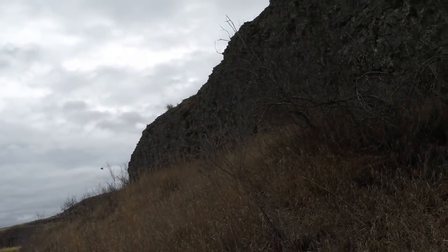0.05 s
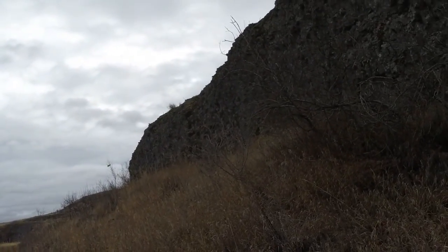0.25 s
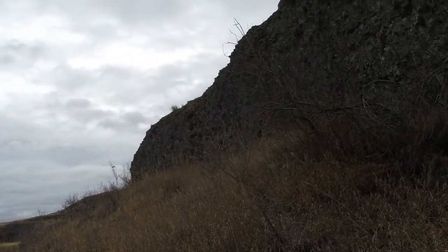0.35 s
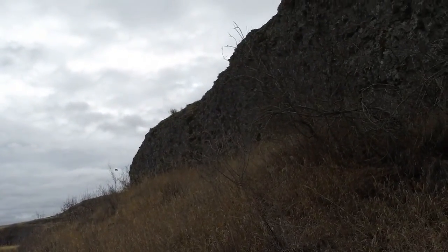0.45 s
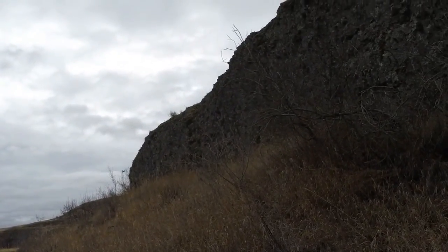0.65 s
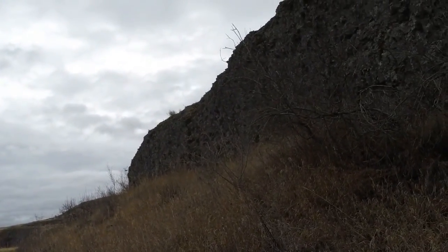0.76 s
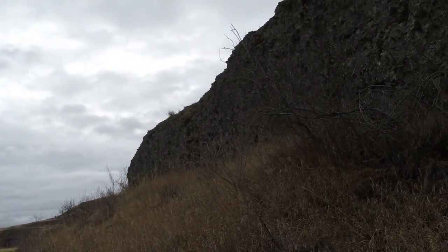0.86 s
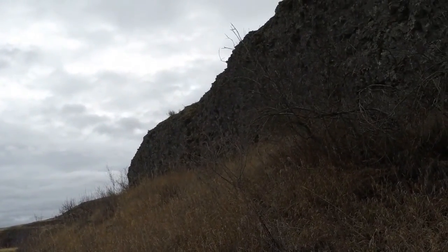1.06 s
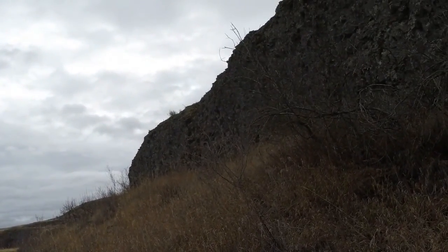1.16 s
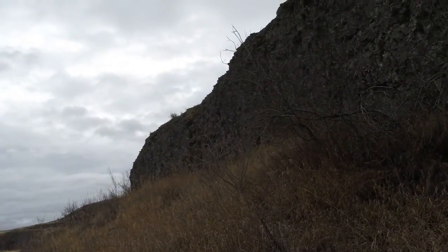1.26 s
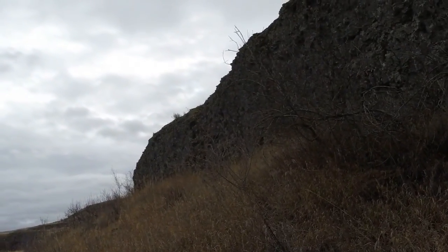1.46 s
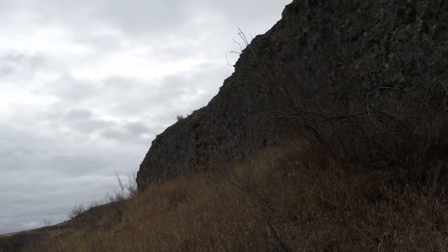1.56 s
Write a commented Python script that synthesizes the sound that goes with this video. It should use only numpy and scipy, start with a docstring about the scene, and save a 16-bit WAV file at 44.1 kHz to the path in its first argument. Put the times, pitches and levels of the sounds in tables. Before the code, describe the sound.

Two loud shotgun blasts echo off a rock cliff and open hills in light wind.

```python
"""Two shotgun blasts below a rock cliff in open hills, close enough to overload the microphone.
Each follows a thin pellet crack, arrives with its ground bounce, slaps back once from near rock,
then scatters off the rough cliff. The hills roll the sound back, ever duller, and a far face
returns a small clap. Light wind buffets the microphone; a faint hiss sinks after the first blast."""
import sys
import numpy as np
from scipy import signal
from scipy.fft import rfft, irfft, next_fast_len
from scipy.io import wavfile
from scipy.ndimage import uniform_filter1d

SR = 44100
rng = np.random.default_rng(int(sys.argv[2]) if len(sys.argv) > 2 else 0)


def store_pcm(level_fs):
    """Save levels as 16-bit WAV."""
    pcm = np.round(np.clip(level_fs, -1, 1) * 32767).astype(np.int16)
    wavfile.write(sys.argv[1], SR, np.atleast_2d(pcm).T)


N = 70560
N_FFT = next_fast_len(N + 8192)
TIME_S = np.arange(N) / SR
FREQ_HZ = np.fft.rfftfreq(N_FFT, 1 / SR)

# muzzle blasts: t/s, level/dB, overpressure/ms, ground bounce delay/ms, cut-off/Hz, relative grit/dB
SHOTS = [(.2194, 14, .43, 1.26, 14000, -18), (.9823, 11, .45, 1.17, 8500, -11.5)]
# spectrum of front roughness and pellet cracks: f/Hz, level/dB
GRIT_SPECTRUM = [(100, -26.5), (700, -14.5), (1200, -7.5), (1650, 9.5), (2500, -1.5), (4600, 5),
                 (6500, -7.5), (15000, -12.5)]


def amp(db):
    """Decibels to gain."""
    return 10 ** (np.asarray(db) / 20)


def unit_rms(x):
    """Scale to rms 1."""
    return x / np.sqrt(np.mean(x ** 2) + 1e-20)


def log_interp(points, hz=FREQ_HZ):
    """Interpolate (f/Hz, value) points on a log frequency axis."""
    point_hz, values = np.transpose(points)
    return np.interp(np.log(hz + 1), np.log(point_hz + 1), values)


def gain_curve(points):
    """Gain per sample from (t/s, level/dB) points."""
    return amp(np.interp(TIME_S, *np.transpose(points)))


def lowpass(cut_hz):
    """First-order treble loss, as gain per frequency."""
    return 1 / np.hypot(1, FREQ_HZ / cut_hz)


def causal_filter(x, gain):
    """Minimum-phase filter with the given gain per frequency."""
    cepstrum = irfft(np.log(np.maximum(gain, 1e-6)), N_FFT)
    cepstrum[1:N_FFT // 2] *= 2
    cepstrum[N_FFT // 2 + 1:] = 0
    return irfft(rfft(x, N_FFT) * np.exp(rfft(cepstrum)), N_FFT)[:N]


def noise(spectrum, gain=1):
    """Noise of rms 1, shaped by (f/Hz, level/dB) points and a gain per frequency."""
    white = rfft(rng.standard_normal(N_FFT))
    return unit_rms(irfft(white * amp(log_interp(spectrum)) * gain, N_FFT)[:N])


def decay(start_s, fall_s):
    """1 until start_s, then exponential fall."""
    return np.exp(-np.maximum(TIME_S - start_s, 0) / fall_s)


def swell(peak_s, rise_s, fall_s):
    """Gaussian rise, exponential fall."""
    return np.exp(-(np.minimum(TIME_S - peak_s, 0) / rise_s) ** 2) * decay(peak_s, fall_s)


def burst(start_s, fall_s):
    """Instant attack, exponential fall."""
    return (TIME_S >= start_s) * decay(start_s, fall_s)


def background_hiss():
    """Faint hiss that sinks after the first blast as the recorder's gain drops."""
    # envelope: t/s, level/dB
    hiss_levels = [(0, -54), (.2, -53.5), (.4, -55), (.68, -65), (.9, -59), (1.1, -66), (1.6, -65.5)]
    # hiss spectrum: f/Hz, level/dB
    spectrum = [(60, 0), (170, -3), (400, 2), (800, -5.5), (1700, -13), (3500, -16.5), (7000, -24),
                (15000, -33)]
    return gain_curve(hiss_levels) * noise(spectrum)


def wind():
    """Low buffeting on the microphone."""
    # envelope: t/s, level/dB
    buffet_levels = [(0, -55), (.04, -43.5), (.11, -53), (.17, -45), (.21, -52), (.42, -58), (.5, -50.5),
                     (.62, -51.5), (.69, -50.5), (.79, -46), (.87, -45), (.95, -44.5), (1.1, -49),
                     (1.18, -56), (1.3, -48.5), (1.45, -61), (1.6, -48)]
    # rumble spectrum: f/Hz, level/dB
    spectrum = [(15, -13), (28, -3.5), (45, -13), (65, -8), (120, -13), (300, -37.5), (1000, -70)]
    return gain_curve(buffet_levels) * noise(spectrum)


def far_claps():
    """A far rock face returns one small clap per shot."""
    # echoes: t/s, level/dB, rise/s, fall/s, cut-off/Hz
    claps = [(0.798, -35.5, 0.0019, 0.0039, 11900), (1.562, -38, 0.0024, 0.0049, 4620)]
    # echo spectrum: f/Hz, level/dB
    spectrum = [(50, 6), (150, 3), (350, 2), (800, 8), (1800, 1.5), (2700, 0), (4500, -13), (8000, -31),
                (15000, -39)]
    return sum(amp(db) * swell(peak_s, rise_s, fall_s) * noise(spectrum, lowpass(cut_hz))
               for peak_s, db, rise_s, fall_s, cut_hz in claps)


def hill_echoes():
    """Hillsides answer in broad swells, dulled by the air."""
    # echoes: t/s, level/dB, rise/s, fall/s, air cut-off/Hz
    echoes = [(0.551, -43, 0.044, 0.05, 4430), (0.586, -43, 0.01, 0.11, 1030),
              (0.843, -47, .015, 0.04, 2780), (0.927, -38.5, 0.036, 0.021, 1360),
              (0.959, -38.5, 0.013, 0.0034, 1410), (1.255, -41, 0.062, 0.11, 4300),
              (1.337, -37.5, 0.0064, 0.06, 880), (1.6, -50, 0.0094, 0.048, 1840)]
    # echo spectrum: f/Hz, level/dB
    spectrum = [(60, -20), (250, -9.5), (450, -3), (650, 3), (1100, -4), (2500, -5), (5000, -11.5),
                (15000, -41)]
    return sum(amp(db) * swell(peak_s, rise_s, fall_s) * noise(spectrum, lowpass(cut_hz) ** 2)
               for peak_s, db, rise_s, fall_s, cut_hz in echoes)


def terrain_patches(shape, depth_db=2.5, width_bins=5, width_frames=6):
    """Uneven terrain: random gain, smooth over frequency and time."""
    field = uniform_filter1d(rng.standard_normal(shape), size=width_bins, axis=0)
    field = uniform_filter1d(field, size=width_frames, axis=1)
    return unit_rms(amp(depth_db * unit_rms(field)))


def rolling_tail(levels_db=(-29, -31), rise_s=0.031):
    """Open-country tail of each shot: the longer the path, the more treble the air takes."""
    # initial spectrum: f/Hz, level/dB
    spectrum = [(40, -10), (120, 1.5), (280, 2.5), (600, -6), (1100, -9), (2200, -11.5), (4000, -17),
                (7000, -22), (11000, -21.5), (15000, -18.5)]
    # decay times: f/Hz, T60/s
    decay_times = [(60, 1.12), (250, 0.54), (700, 2.6), (2000, 1.71), (4000, 1.26), (8000, 0.65),
                   (15000, 0.27)]
    out = np.zeros(N)
    for (shot_s, *_), db in zip(SHOTS, levels_db):
        bin_hz, frame_s, bins = signal.stft(noise(spectrum), SR, nperseg=512)
        t60_s = log_interp(decay_times, bin_hz)[:, None]
        fade = amp(-60 * np.maximum(frame_s - shot_s, 0) / t60_s)
        _, tail = signal.istft(bins * fade * terrain_patches(bins.shape), SR, nperseg=512)
        attack = np.clip((TIME_S - shot_s) / rise_s, 0, 1)
        out += amp(db) * attack * tail[:N]
    return out


def cliff_scatter(rise_s=0.0023, facets_per_s=3500, diffuse_db=-4):
    """Rough ground and cliff scatter the blast: a click per facet, over diffuse noise."""
    # scattering stretches: t/s, length/s, level/dB, release/s, cut-off/Hz
    stretches = [(0.221, 0.011, -29.5, 0.053, 11700), (0.2576, 0.011, -18.5, .016, 10800),
                 (.275, 0.0074, -28, 0.0083, 2940), (0.299, 0.013, -26.5, 0.0067, 5240),
                 (.324, 0.0075, -20, 0.014, 11000), (.337, 0.035, -30, 0.0033, 3500),
                 (0.986, .02, -28.5, 0.046, 12000), (1.022, 0.039, -20, 0.023, 7850)]
    # rock echo spectrum: f/Hz, level/dB
    spectrum = [(30, -16), (100, -9), (300, -1), (550, 1.5), (950, -3), (1300, -4.5), (1600, -11),
                (2300, -6), (3000, -11.5), (4700, -18), (10000, -30.5), (15000, -38)]
    facets = unit_rms((rng.random(N) < facets_per_s / SR) * rng.choice([-1, 1], N))
    returns = unit_rms(facets + amp(diffuse_db) * rng.standard_normal(N))
    rock_gain = amp(log_interp(spectrum))
    out = np.zeros(N)
    for start_s, length_s, db, release_s, cut_hz in stretches:
        attack = np.clip((TIME_S - start_s) / rise_s, 0, 1)
        envelope = attack * decay(start_s + length_s, release_s)
        out += amp(db) * causal_filter(envelope * returns, unit_rms(rock_gain * lowpass(cut_hz)))
    return out


def rock_slaps():
    """Near rock returns one sharp echo of each blast."""
    # echoes: t/s, level/dB, overpressure/ms, ground bounce delay/ms, cut-off/Hz, relative grit/dB
    slaps = [(.2834, 8.7, .37, .87, 8000, -14), (1.0034, 7.3, .34, .93, 4800, -18)]
    return blasts(slaps)


def pellet_cracks(fall_s=0.00081):
    """Thin, bright cracks of the pellets just ahead of each blast."""
    # cracks: t/s, level/dB
    cracks = [(0.2163, -20.5), (0.2179, -17.5), (0.9808, -27)]
    return noise(GRIT_SPECTRUM) * sum(amp(db) * burst(start_s, fall_s) for start_s, db in cracks)


def shock(start_s, overpressure_s):
    """A pressure jump that falls through zero into a longer suction."""
    return burst(start_s, overpressure_s) * (1 - (TIME_S - start_s) / overpressure_s)


def blasts(arrivals, ground_cut_hz=340, grit_fall_s=0.0016):
    """Each shock with its dull ground bounce, roughened by tiny reflections off grass and stones."""
    # blast colour: f/Hz, level/dB
    colour = [(30, -21), (120, -1), (300, -0.2), (600, 3.5), (1200, -3.5), (2500, -2.5), (4000, 1.5),
              (7000, -23.5), (15000, -18)]
    out = np.zeros(N)
    for start_s, db, overpressure_ms, bounce_ms, cut_hz, grit_db in arrivals:
        direct = shock(start_s, overpressure_ms / 1000)
        delayed = shock(start_s + bounce_ms / 1000, overpressure_ms / 1000)
        bounce = causal_filter(delayed, lowpass(ground_cut_hz))
        front = causal_filter(direct + bounce, amp(log_interp(colour)))
        grit = amp(grit_db) * burst(start_s, grit_fall_s) * noise(GRIT_SPECTRUM)
        out += amp(db) * causal_filter(grit - front, lowpass(cut_hz) ** 2)
    return out


def scene():
    """Shots, echoes from near to far, wind and hiss; mono."""
    shots = blasts(SHOTS) + pellet_cracks()
    echoes = rock_slaps() + cliff_scatter() + rolling_tail() + hill_echoes() + far_claps()
    return (shots + echoes + wind() + background_hiss())[None]


def record(dry):
    """Overload: clip at full scale with a rounded knee, then band-limit."""
    hardness, top_hz, edge_hz = 10, 15900, 1200
    clipped = dry / (1 + np.abs(dry) ** hardness) ** (1 / hardness)
    passband = np.sin(np.pi / 2 * np.clip((top_hz - FREQ_HZ) / edge_hz, 0, 1)) ** 2
    return irfft(rfft(clipped, N_FFT) * passband, N_FFT)[:, :N]


dry = scene()
out = record(dry)
store_pcm(out)
```